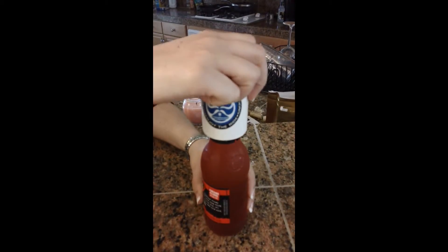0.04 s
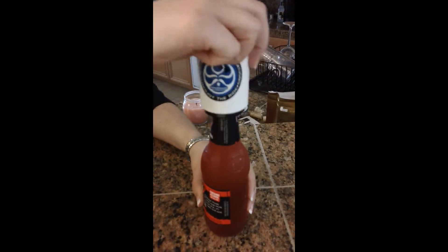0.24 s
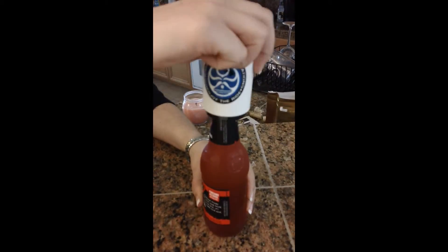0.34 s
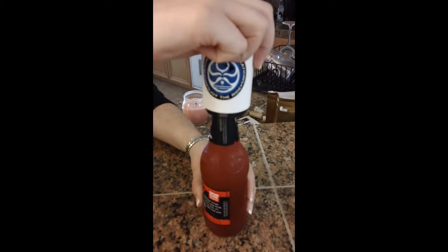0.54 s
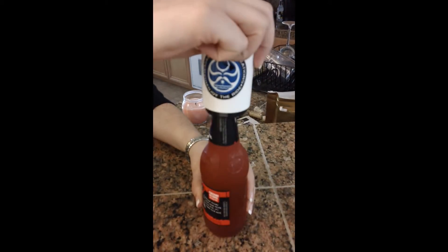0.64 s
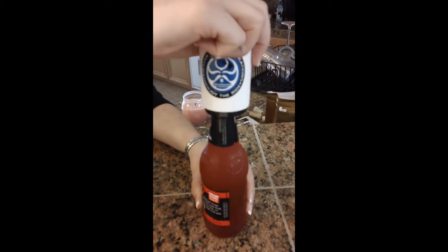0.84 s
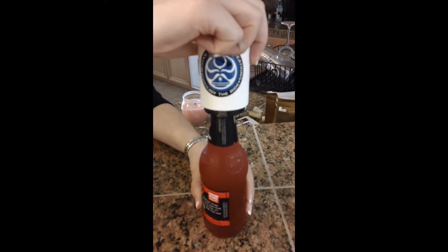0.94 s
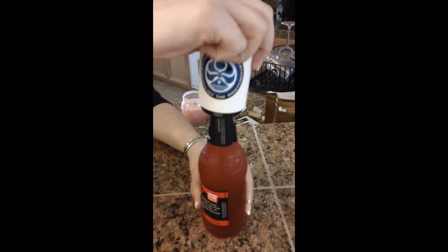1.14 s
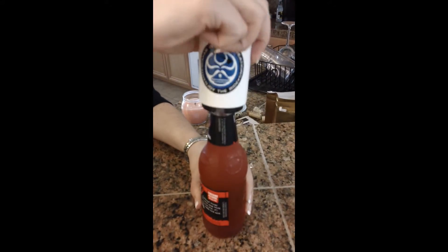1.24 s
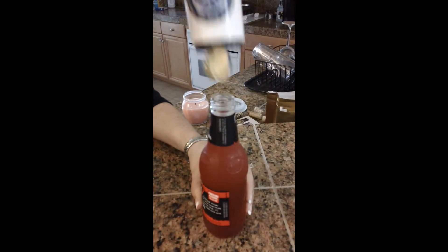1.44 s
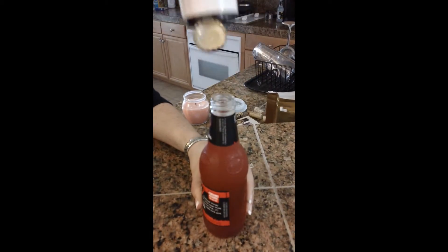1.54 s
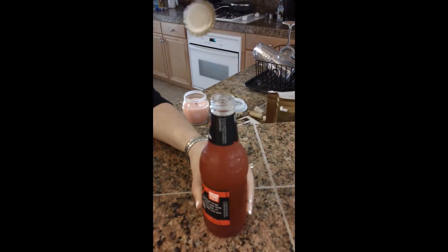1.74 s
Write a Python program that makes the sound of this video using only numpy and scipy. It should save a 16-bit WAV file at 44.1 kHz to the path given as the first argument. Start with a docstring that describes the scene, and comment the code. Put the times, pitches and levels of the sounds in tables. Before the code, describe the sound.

Bottle cap cracks loose with a spurt of gas, then the opener snaps away with metallic clatter

```python
"""A quiet kitchen with a humming appliance, where a push-down opener takes the cap off a glass bottle close by.
At the start the room is still fading from an earlier sound. The jaw scrapes and squeaks on the cap, noisy gas
rushes out and the cap gives with a crack. A second later the opener snaps off the neck, the loose cap rings and
small metal parts clatter. Blows are short shaped noise, rings are fading sine waves, and hiss, tail and air are
coloured noise. The recorder's gain control ducks the room after both cracks."""
import sys
import numpy as np
from scipy import signal
from scipy.fft import rfft, irfft
from scipy.io import wavfile
from scipy.ndimage import uniform_filter1d, minimum_filter1d

SR = 44100
rng = np.random.default_rng(int(sys.argv[2]) if len(sys.argv) > 2 else 0)


def waveform_to_disk(signal):
    """Save audio, clipped to [-1, 1], as 16-bit WAV at the path in sys.argv[1]."""
    frames = np.transpose(np.atleast_2d(signal))
    scaled = np.clip(frames, -1, 1) * 32767
    samples = np.round(scaled).astype(np.int16)
    wavfile.write(sys.argv[1], SR, samples)


N = 79380  # length in samples

# In every table t60_s is the time a ring takes to fall by 60 dB,
# and decay_s is the time a blow takes to fall to about a third.
# Colour tables give the balance between pitches; the overall level is set elsewhere.

# Kitchen air colour: pitch_hz, level_db (per Hz)
AIR_COLOUR = [(25, -23), (60, -8.5), (120, -3.5), (250, 2.5), (400, -4.5), (700, -7.5), (1300, -15),
              (2500, -20), (5000, -24.5), (10000, -27.5), (12500, -39.5), (14500, -30)]
AIR_DB, AIR_PATCH_DB = -46.5, 0.5  # level and its slow drift
# Appliance hum, before it wavers: pitch_hz, level_db (rms)
HUM = [(120, -58.5), (241, -53), (269, -47), (480, -63), (749, -62)]
HUM_WAVER, HUM_WAVER_S = 0.3, 0.06  # depth as a share of the tone, and pace

# Fading tail of an earlier sound in the room, colour: pitch_hz, level_db (per Hz)
TAIL_COLOUR = [(60, -1), (500, 8), (1300, -1.5), (3000, -10.5), (8000, -16.5), (14000, -31.5)]
TAIL_DB, TAIL_FADE_DB_PER_S = -43, 53  # level at the start, and fade

# Ticks of the opener's spring and jaw: start_s, level_db, decay_s, tilt_db_per_octave
TICKS = [(.013, -37.5, 0.0062, -4.5), (0.3476, -24, 0.0055, 2.5), (.3630, -19, 0.0055, 2),
         (.3830, -25.5, 0.0027, -1), (0.443, -25.5, 0.0044, 2.5), (0.4768, -18, 0.0023, 1.5),
         (1.083, -36.5, 0.0031, -4), (1.1030, -43, 0.0045, 0), (1.2206, -38, 0.0017, -6),
         (1.3619, -8, 0.0024, 1.5), (1.3702, -7, 0.0024, 0)]
# Tick colour: pitch_hz, level_db (per Hz)
TICK_COLOUR = [(100, -18), (400, 2.5), (1300, 3.5), (3500, 0.5), (5200, -1), (7000, -1), (11000, -3.5),
               (12500, -17), (14500, -2)]

# Dull knocks of the opener's sleeve on the bottle: start_s, level_db, pitch_ratio
KNOCKS = [(.2015, -19.5, 0.91), (.3340, -27, 1), (.3495, -15.5, 1.05), (.4810, -22.5, .44),
          (.4900, -23.5, 0.757), (.8700, -43, 1), (.9790, -29, 1.04), (1.0840, -28.5, 0.91),
          (1.0872, -25, 1), (1.2198, -38, 1.3), (1.2538, -26.5, 1.003), (1.3630, -15.5, 0.702),
          (1.3650, -16, 0.47), (1.3705, -9, 0.88)]
# Tones of the sleeve: pitch_hz, level_db, t60_s
SLEEVE = [(772, 1, .024), (1573, -13, 0.034), (2900, -23, .015)]

# The jaw scrapes down over the cap's crimp: start_s, level_db, decay_s, tilt_db_per_octave
SCRAPES = [(.2040, -37, 0.0063, 1), (0.2131, -28.5, .003, 1.5), (0.2182, -23.5, .0025, 1.5),
           (.2235, -23, 0.0049, 0.5), (0.2428, -24.5, 0.0013, 0.5), (.2468, -19, 0.0017, 0.5),
           (0.2509, -15, 0.0015, -1)]
# Scrape colour: pitch_hz, level_db (per Hz)
SCRAPE_COLOUR = [(150, -14.5), (550, 4), (1100, -8.5), (1700, -9), (2400, 5.5), (3200, -5.5), (4300, 3.5),
                 (5500, -5.5), (8000, -12), (11000, -16.5), (14500, -19)]

# Level of the escaping gas over time: time_s, level_db
GAS_LEVEL = [(.220, -54), (.229, -26.5), (.238, -26), (.245, -20), (.251, -18.5), (0.259, -18),
             (.264, -19.5), (.273, -16.5), (.281, -20), (.292, -43.5), (.36, -35.5), (.46, -58)]
# Gas hiss colour: pitch_hz, level_db (per Hz)
GAS_COLOUR = [(60, -22), (300, -21.5), (520, 8), (800, -15.5), (1200, -3), (1700, -14), (2400, -14.5),
              (3300, -20.5), (4700, 1), (7000, -8.5), (9500, -7.5), (11200, -17.5), (12400, -14),
              (14500, -3)]
GAS_ROUGH_DB, GAS_SPUTTER_S = 2.5, 0.0015  # depth and pace of the sputter
# Tones of the crimp crackling as it bends: pitch_hz, level_db, t60_s
CRIMP = [(1273, -4.5, 0.0077), (2360, -2.5, .012), (4250, -2, 0.0078), (4930, -1, 0.0078),
         (5570, 0.5, 0.013), (7930, -5.5, 0.0096), (11200, -2.5, .012), (13640, 0, .008)]
CRIMP_SLIPS_PER_S, CRIMP_DB = 160, -4  # average slips for each tone; level against the hiss

# Tones of the jaw slipping on the cap: pitch_hz, level_db, t60_s
SQUEAK = [(4680, -0.5, .012), (7150, -14, 0.021), (11240, -0.5, 0.018)]
SQUEAK_S, SQUEAK_DB, SQUEAK_RISE_S = 0.2290, -3.5, 0.0017

# The cap gives way: start_s, level_db, decay_s
POP = (0.2652, 7.34, 0.001)
# Pop colour: pitch_hz, level_db (per Hz)
POP_COLOUR = [(30, -2.5), (150, -5.5), (500, -1), (1200, -0.5), (2200, -0.5), (4000, -2.5), (6500, -1.5),
              (9000, -2.5), (11500, -9.5), (15000, -19.5)]
# Short ring of the cap as it buckles: pitch_hz, level_db, t60_s
BUCKLE = [(534, -13, .03), (1128, 0.5, .014), (1390, -4.5, 0.0085), (2250, -9, .008), (6350, -0.5, 0.012),
          (8500, -1.5, 0.0059)]
# Ring of the bottle and opener after the pop: pitch_hz, level_db, t60_s
BOTTLE = [(390.5, -34, 0.41), (515, -50, .35), (609, -32, 0.355), (754, -31.5, 0.44), (1131.6, -29.5, 0.38),
          (2125, -33, .35), (2225, -28, 0.43), (2270, -34, 0.34), (2430, -35.5, .3), (4564, -36, 0.41),
          (4800, -41, .35)]

# The spring rings briefly as it returns: start_s, pitch_hz, level_db, t60_s
SPRING = [(0.3651, 5250, -15, 0.026), (.3720, 11350, -26, 0.044), (.4435, 5270, -29, 0.023),
          (0.4775, 5320, -22, 0.014)]

# The opener snaps off the neck: start_s, level_db, decay_s
SNAP = (1.3449, 10.78, 0.0029)
# Snap colour: pitch_hz, level_db (per Hz)
SNAP_COLOUR = [(60, -55), (200, -44), (400, -34), (700, -12), (1100, -6), (1900, -5), (2700, -5.5),
               (3500, -10.5), (4800, -2.5), (6200, -5.5), (9800, 2.5), (12500, -8), (15000, -3)]
# Ring of the opener's hollow body as it leaves the neck: pitch_hz, level_db, t60_s
BODY = [(947, -12, 0.041), (1080, -1, 0.034), (1460, -5.5, 0.032), (1870, -5.5, 0.016), (2704, -2, 0.0091),
        (15100, -2, .008)]

# Free ring of the cap: pitch_hz, level_db, t60_s
CAP = [(4360, -30.5, .5), (4445, -26, .35), (4560, -33.5, 0.33), (4720, -39, 0.39), (4790, -32, .35),
       (7915, -19.5, .28), (10700, -33.5, .15)]
# The loose cap touches the opener and rings: start_s, pitch_hz, level_db, t60_s
CAP_RINGS = [(1.3452, 4570, -1.5, 0.037), (1.3796, 4720, 3.5, 0.022), (1.3876, 4680, 0, 0.04),
             (1.3880, 4460, -7, 0.025), (1.4070, 4760, -14, 0.018)]
CAP_RISE_S = 0.0015
# Shimmer of the spinning cap, colour: pitch_hz, level_db (per Hz)
SHIMMER_COLOUR = [(3000, -57), (4050, -13), (4400, -2), (4700, -10), (5100, -19), (6500, -46)]
SHIMMER_DB, SHIMMER_T60_S = -21, 0.38

# Light clatter of cap and opener: start_s, level_db, decay_s, tilt_db_per_octave, ring_pitch_hz, ring_level_db
CLATTER = [(1.5879, -25, 0.0038, 2.5, 2550, -27), (1.6850, -30.5, 0.0056, -5, 2250, -45),
           (1.6910, -29, .004, -4.5, 2345, -22.5), (1.6950, -32, 0.0058, -4, 2680, -25.5),
           (1.7087, -19, 0.0034, -0.5, 3590, -27), (1.7492, -26.5, 0.0042, -2.5, 2980, -26.5)]
# Clatter colour: pitch_hz, level_db (per Hz)
CLATTER_COLOUR = [(200, -35), (1150, -3), (1500, -10.5), (2500, -5.5), (3900, -7.5), (4600, 6),
                  (5300, -0.5), (6200, -16), (7400, -1), (8600, -4), (10000, -16), (11200, -7.5),
                  (12500, -21), (14800, -13.5)]
CLATTER_RISE_S, CLATTER_T60_S = 0.00072, 0.026

# Close echoes, off the hand on the opener and off the counter
HAND_ECHO_S, HAND_ECHO_DB = 0.001456, -13
COUNTER_ECHO_S, COUNTER_ECHO_DB = 0.0024, -15.5

# How long the room rings at each pitch: pitch_hz, t60_s
ROOM_T60 = [(200, 0.4), (600, 0.61), (2000, 0.57), (5000, 0.5067), (9000, .5), (15000, 0.2)]
# Room colour: pitch_hz, level_db
ROOM_COLOUR = [(60, -14.5), (500, 8.5), (1200, 1), (2400, 4), (5000, 1), (10000, -3), (15000, 3.5)]
ROOM_DB, ROOM_SWELL_S = -14.5, 0.013  # the tail
EARLY_DB, EARLY_DECAY_S = -11, 0.025  # the quick reflections

# Recorder: gain control threshold and recovery, then the highest pitch it keeps
LIMIT_DB, RECOVER_DB_PER_S, EDGE_HZ = -9, 13, 15500


def amp(db):
    """Turns decibels into a gain."""
    return 10 ** (np.asarray(db) / 20)


def evened(x):
    """Scales a sound to an rms (average strength) of one."""
    return x / np.sqrt(np.mean(x ** 2) + 1e-20)


def read(points, hz):
    """Reads a table between its points, with pitch spaced as the ear hears it (log scale)."""
    pitch_hz, value = np.transpose(points)
    return np.interp(np.log(hz + 1), np.log(pitch_hz + 1), value)


def since(start_s):
    """Seconds elapsed since start_s, zero before."""
    return np.maximum(np.arange(N) / SR - start_s, 0)


def wander(seconds):
    """Smooth random drift of rms one that changes over about the given time."""
    hz = np.fft.rfftfreq(N, 1 / SR)
    smoothing = np.exp(-(hz * seconds) ** 2)
    return evened(irfft(rfft(rng.standard_normal(N)) * smoothing, N))


def noise(points):
    """Steady random hiss with the given colour and an rms of one."""
    return evened(colour(rng.standard_normal(N), points))


def colour(x, points, tilt_db=0, size=4096):
    """Filters with the given colour, tilted per octave above 500 Hz; the filter has unit energy."""
    hz = abs(np.fft.fftfreq(size, 1 / SR))
    octaves = np.log2(np.maximum(hz, 500) / 500)
    log_gain = np.log(amp(read(points, hz) + tilt_db * octaves))
    # the Hilbert transform gives the phase that packs the energy at the front, with none before
    spectrum = np.exp(np.conj(signal.hilbert(log_gain)))
    taps = np.fft.ifft(spectrum).real[:size // 2]
    return signal.fftconvolve(x, taps / np.linalg.norm(taps))[:N]


def close_echoes(x):
    """The hand and the counter each return one echo, which ripples the spectrum of a click."""
    hz = np.fft.rfftfreq(N, 1 / SR)
    echoes = [(HAND_ECHO_S, HAND_ECHO_DB), (COUNTER_ECHO_S, COUNTER_ECHO_DB)]
    comb = 1 + sum(amp(db) * np.exp(-2j * np.pi * hz * delay_s) for delay_s, db in echoes)
    comb = comb / np.sqrt(np.mean(abs(comb) ** 2))
    return irfft(rfft(x) * comb, N)


def burst(points, start_s, db, decay_s, tilt_db=0, rise_s=0.000205):
    """A blow on densely ringing parts: an even spread of pitches that dies within milliseconds."""
    t = since(start_s)
    shape = np.minimum(t / rise_s, 1) * np.exp(-np.maximum(t - rise_s, 0) / decay_s)
    start = np.argmax(t > 0)
    part = shape[start:start + 2048]
    grain = rng.standard_normal(2048)[:len(part)]
    for _ in range(3):
        # even out the pitches, then even out the strength over time
        spectrum = rfft(grain * part)
        grain = irfft(spectrum / (abs(spectrum) + 1e-12), len(part))
        grain = grain / np.sqrt(abs(uniform_filter1d(grain ** 2, size=32)) + 1e-20)
    blow = np.zeros(N)
    blow[start:start + len(part)] = grain * part
    return amp(db) * close_echoes(colour(blow, points, tilt_db))


def ring(modes, start_s, db=0, ratio=1, rise_s=0.00025):
    """A struck object sounds a few fixed tones, each fading at its own pace."""
    t = since(start_s)
    sound = 0
    for hz, level_db, t60_s in modes:
        sound = sound + amp(level_db - 60 * t / t60_s) * np.sin(2 * np.pi * hz * ratio * t)
    return amp(db) * np.minimum(t / rise_s, 1) * sound


def background():
    """Room air is slowly drifting noise; the appliance's hum is tones that waver in strength and phase."""
    sound = noise(AIR_COLOUR) * amp(AIR_DB + AIR_PATCH_DB * wander(0.029))
    for hz, db in HUM:
        waver = 1 + HUM_WAVER * (wander(HUM_WAVER_S) + 1j * wander(HUM_WAVER_S))
        tone = np.exp(2j * np.pi * (hz * since(0) + rng.random()))
        sound = sound + np.sqrt(2) * amp(db) * (waver * tone).real
    return sound


def earlier_tail():
    """A soft hiss of noise, the room's tail of an earlier sound, fades away."""
    return noise(TAIL_COLOUR) * amp(TAIL_DB - TAIL_FADE_DB_PER_S * since(0))


def ticks():
    """The opener's spring and jaw tick: small, quick blows of metal."""
    return sum(burst(TICK_COLOUR, *row, rise_s=0.0007) for row in TICKS)


def knocks():
    """The sleeve knocks dully on the bottle and rings at low tones that die fast."""
    return sum(ring(SLEEVE, *row, rise_s=0.0018) for row in KNOCKS)


def scrape():
    """The jaw catches along the crimp, one small blow after another."""
    return sum(burst(SCRAPE_COLOUR, *row, rise_s=0.00036) for row in SCRAPES)


def gas():
    """Gas sputters out under the crackling crimp and dies to a fizz."""
    time_s, db = np.transpose(GAS_LEVEL)
    level_db = np.interp(np.arange(N) / SR, time_s, db, left=-120, right=-120)
    crackle = 0
    for mode in CRIMP:
        slips = rng.choice([-1., 1.], N) * (rng.random(N) < CRIMP_SLIPS_PER_S / SR)
        crackle = crackle + signal.fftconvolve(slips, ring([mode], 0))[:N]
    rush = evened(noise(GAS_COLOUR) + amp(CRIMP_DB) * evened(crackle))
    return rush * amp(level_db + GAS_ROUGH_DB * wander(GAS_SPUTTER_S))


def squeak():
    """The jaw slips on the cap and sets off high tones that swell and fade in a moment."""
    return ring(SQUEAK, SQUEAK_S, SQUEAK_DB, rise_s=SQUEAK_RISE_S)


def pop():
    """The cap gives with a crack, rings as it buckles and sets the bottle and opener ringing."""
    start_s = POP[0]
    return burst(POP_COLOUR, *POP) + ring(BUCKLE, start_s) + ring(BOTTLE, start_s, rise_s=0.004)


def spring():
    """The returning spring gives brief high rings, one tone at a time."""
    return sum(ring([mode], start_s, rise_s=0.0026) for start_s, *mode in SPRING)


def snap():
    """The opener leaves the neck with a sharp blow and its hollow body rings."""
    body = ring(BODY, SNAP[0], db=1.5, rise_s=0.00076)  # db is added to the table's levels
    return burst(SNAP_COLOUR, *SNAP, rise_s=0.00038) + body


def cap():
    """The loose cap rings freely and against the opener; as it spins, fading noise makes its shimmer."""
    touches = sum(ring([mode], start_s, rise_s=CAP_RISE_S) for start_s, *mode in CAP_RINGS)
    t = since(SNAP[0])
    fade = (t > 0) * amp(SHIMMER_DB - 60 * t / SHIMMER_T60_S)
    shimmer = fade * colour(rng.standard_normal(N), SHIMMER_COLOUR)
    return ring(CAP, SNAP[0]) + touches + shimmer


def clatter():
    """Cap and opener clatter lightly: each contact is a small blow plus one short tone."""
    sound = 0
    for start_s, db, decay_s, tilt_db, hz, ring_db in CLATTER:
        sound = sound + burst(CLATTER_COLOUR, start_s, db, decay_s, tilt_db, CLATTER_RISE_S)
        sound = sound + ring([(hz, ring_db, CLATTER_T60_S)], start_s)
    return sound


def kitchen(x):
    """Quick reflections from the counter and cupboards, then a tail whose fading time depends on pitch."""
    t = since(0.0014)
    chance = rng.random(N) < 3000 / SR  # about 3000 reflections per second
    early = (t > 0) * np.exp(-t / EARLY_DECAY_S) * rng.standard_normal(N) * chance
    # split noise into pitch bands and fade each at its own pace
    hz, time_s, bands = signal.stft(rng.standard_normal(N), SR, nperseg=256)
    bands = bands * amp(-60 * time_s / read(ROOM_T60, hz)[:, None])
    tail = signal.istft(bands, SR, nperseg=256)[1][:N]
    tail = tail * np.minimum(t / ROOM_SWELL_S, 1)
    response = amp(EARLY_DB) * early / np.linalg.norm(early)
    response = response + amp(ROOM_DB) * tail / np.linalg.norm(tail)
    return signal.fftconvolve(x, colour(response, ROOM_COLOUR))[:N]


def scene():
    """Everything reaches one microphone, alike in both channels."""
    near = ticks() + knocks() + scrape() + gas() + squeak() + pop() + spring() + snap() + cap() + clatter()
    mix = background() + earlier_tail() + near + kitchen(near)
    return np.array([mix, mix])


def record(dry):
    """Gain control drops just ahead of a peak and recovers slowly; peaks clip; then the top is cut off."""
    power = uniform_filter1d((dry ** 2).mean(0), size=132)
    power_db = 10 * np.log10(abs(power) + 1e-12)
    recovery_db = since(0) * RECOVER_DB_PER_S
    # the loudest level so far, sinking steadily until something louder comes
    held_db = np.maximum.accumulate(power_db + recovery_db) - recovery_db
    over_db = np.maximum(held_db - LIMIT_DB, 0)
    gain_db = uniform_filter1d(minimum_filter1d(-over_db, size=100), size=64)
    clipped = np.clip(dry * amp(gain_db), -0.94, 0.94)
    low_pass = signal.firwin(511, EDGE_HZ, window=("kaiser", 8), fs=SR)
    return signal.oaconvolve(clipped, low_pass[None], "same")


dry = scene()
out = record(dry)
waveform_to_disk(out)
```